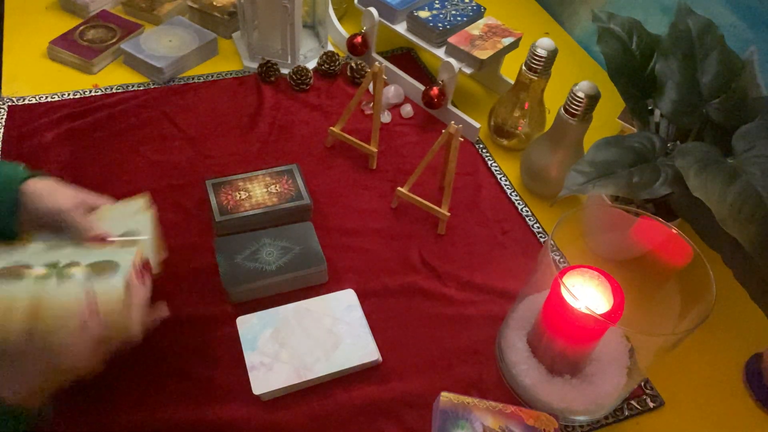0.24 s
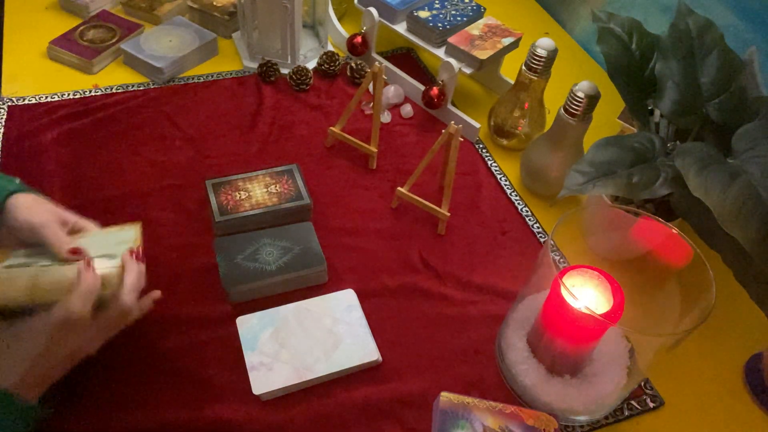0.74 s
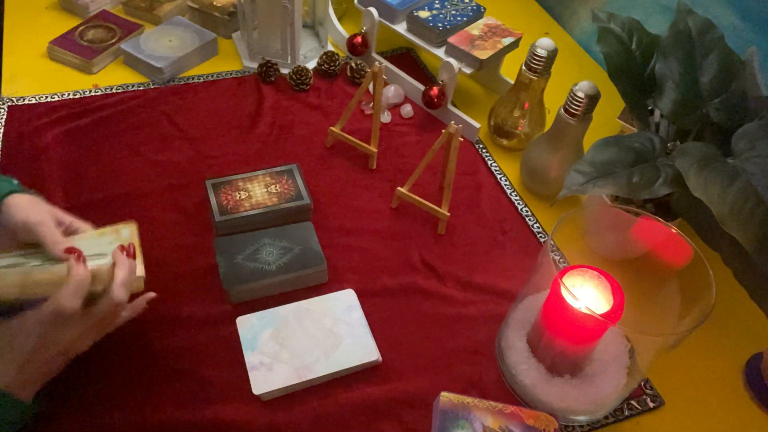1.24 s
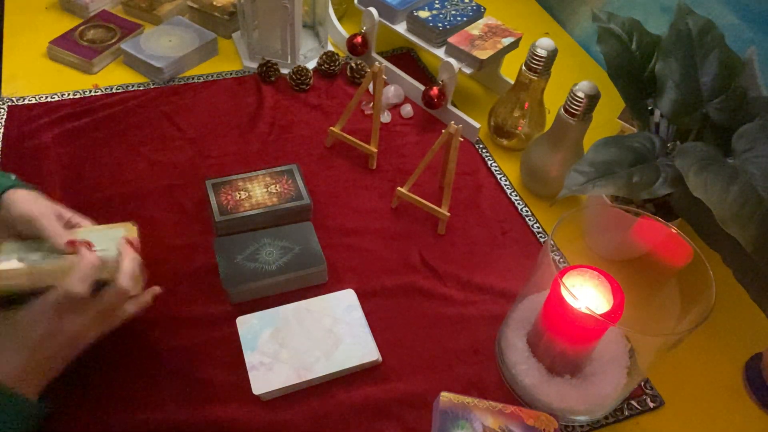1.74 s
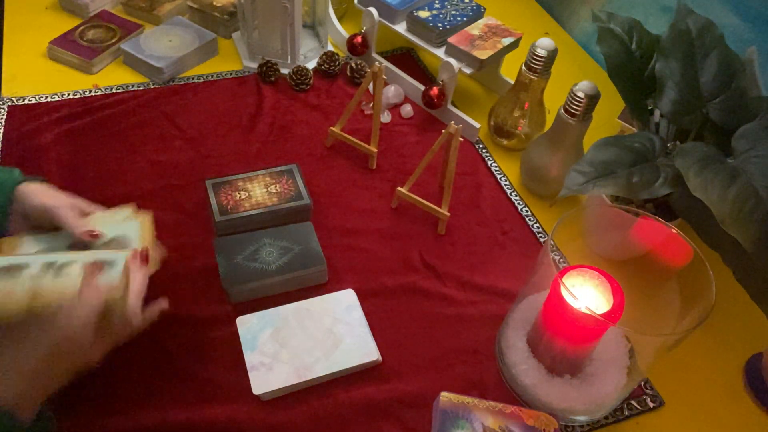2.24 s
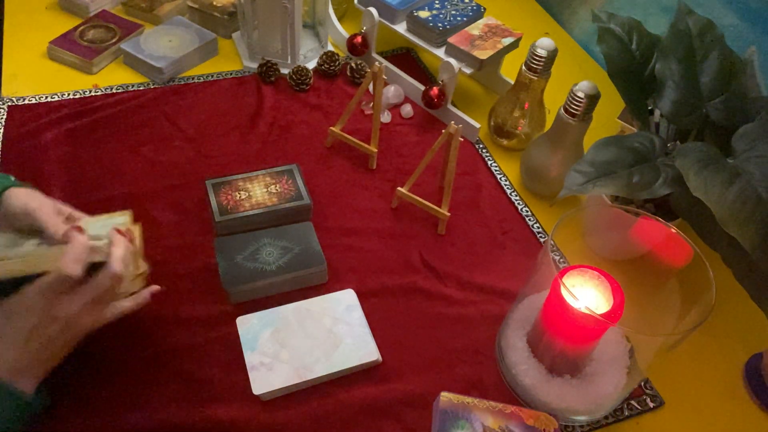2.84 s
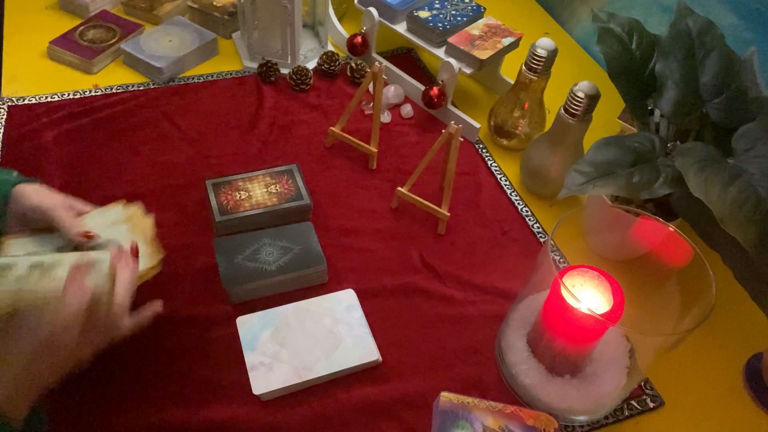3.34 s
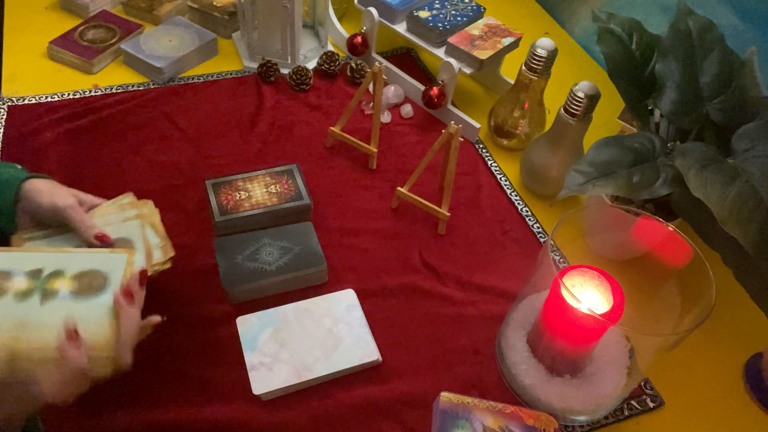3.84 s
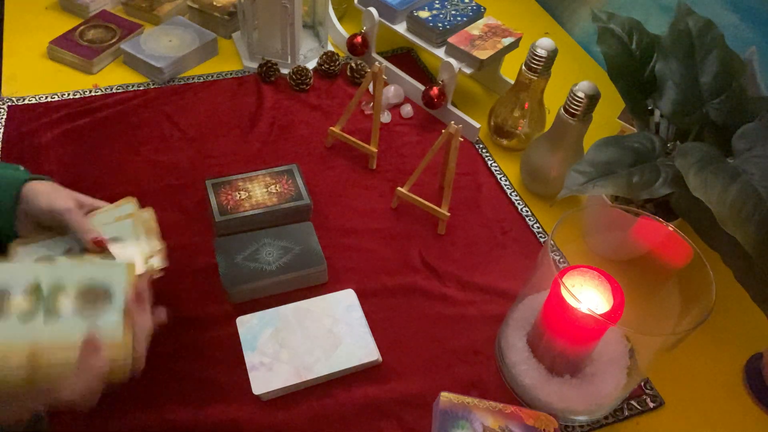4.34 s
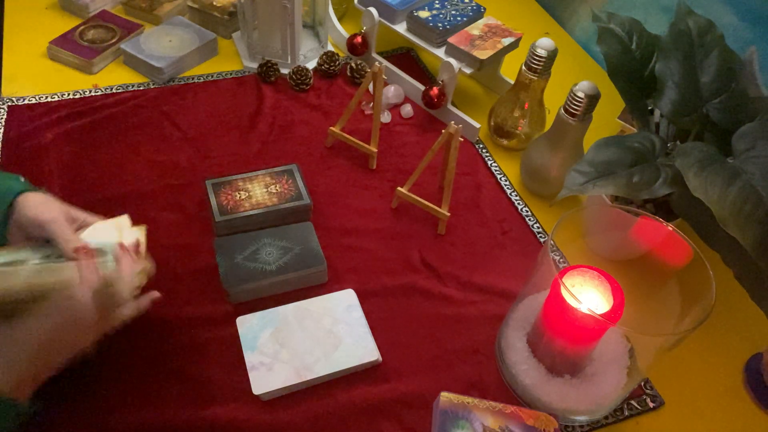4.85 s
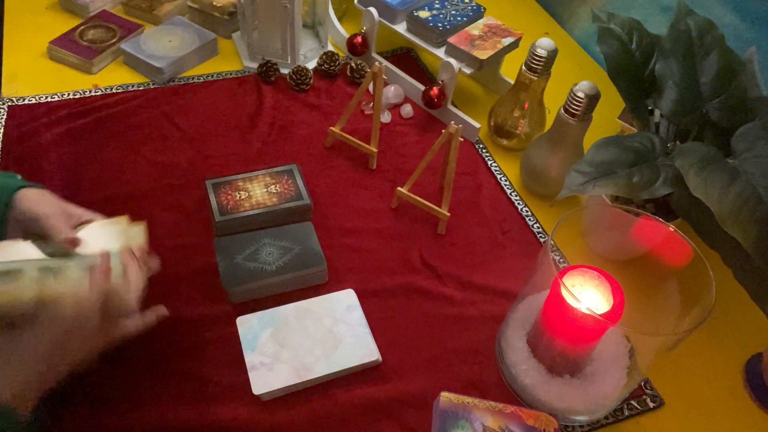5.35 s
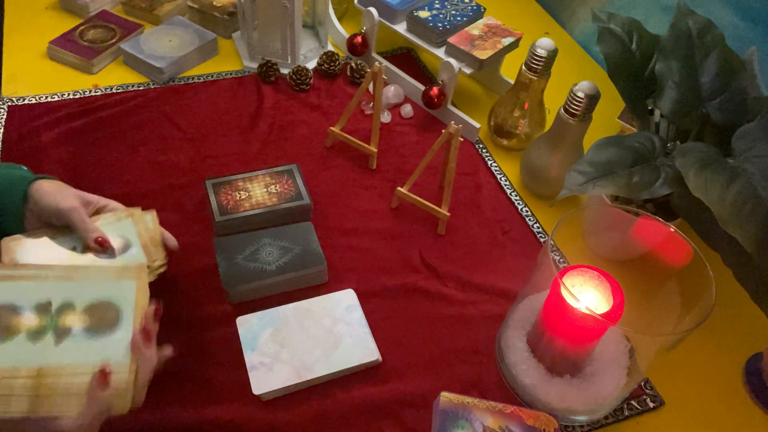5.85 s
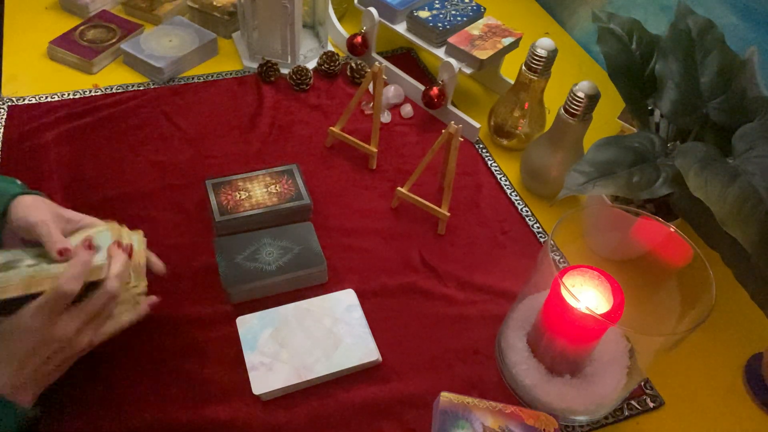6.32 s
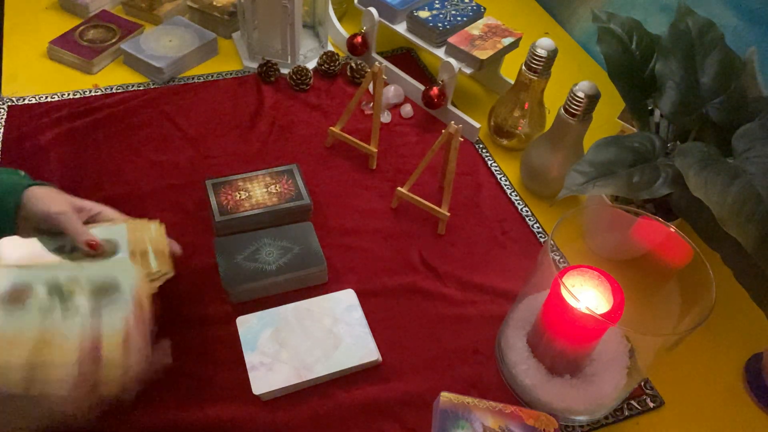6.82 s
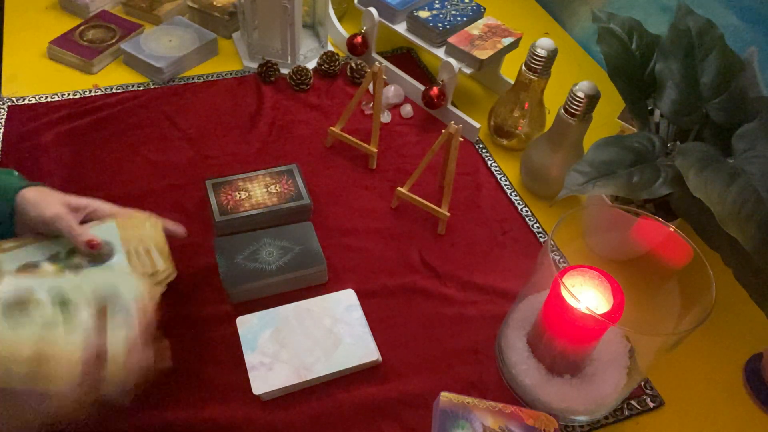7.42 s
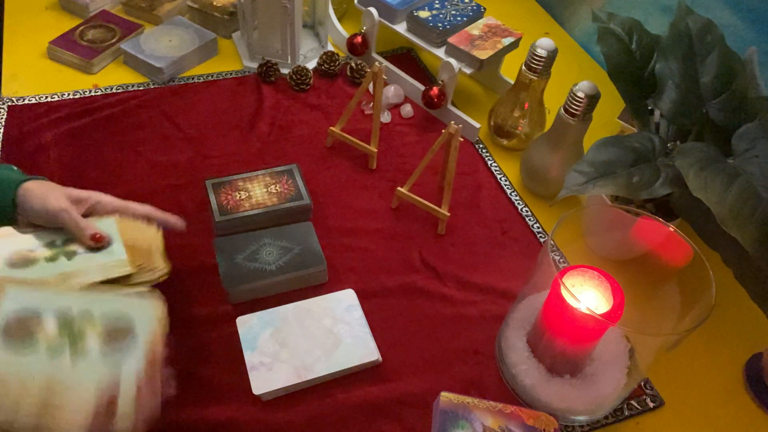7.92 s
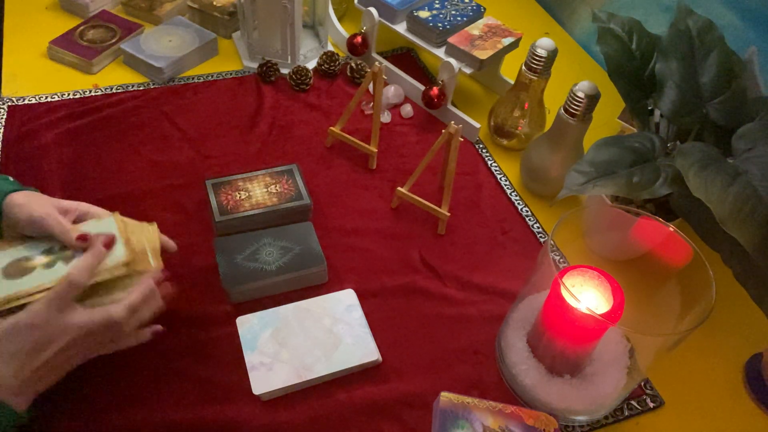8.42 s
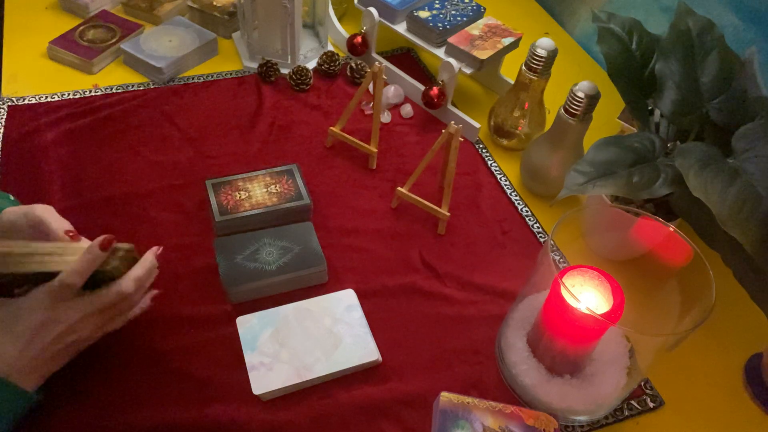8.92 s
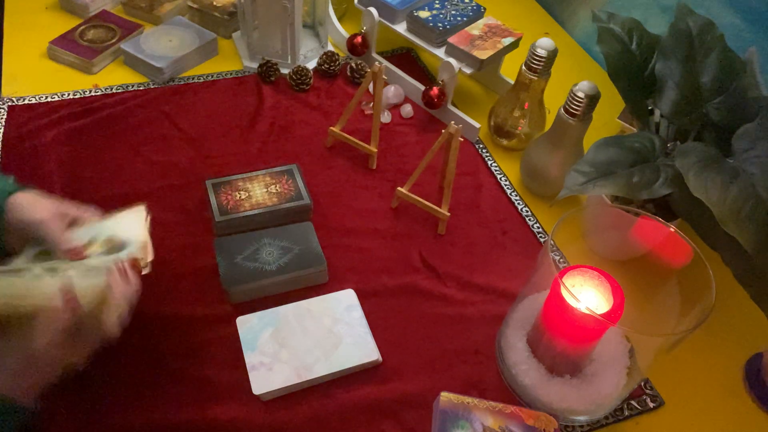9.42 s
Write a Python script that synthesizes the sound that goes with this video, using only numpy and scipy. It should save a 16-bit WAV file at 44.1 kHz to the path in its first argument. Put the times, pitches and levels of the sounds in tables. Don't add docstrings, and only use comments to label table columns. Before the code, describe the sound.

Hands shuffle big coated cards close by in a quiet furnished room: knock, drag, slide, slap, about four strokes a second.

```python
import sys
import numpy as np
from scipy import signal
from scipy.fft import rfft, irfft, next_fast_len
from scipy.io import wavfile
from scipy.ndimage import map_coordinates

SR = 44100
rng = np.random.default_rng(int(sys.argv[2]) if len(sys.argv) > 2 else 0)


def generate_wav(sig):
    pcm = np.round(np.clip(np.atleast_2d(sig).T, -1, 1) * 32767).astype(np.int16)
    wavfile.write(sys.argv[1], SR, pcm)


def ratio_of_db(decibels):
    return 10 ** (np.asarray(decibels, float) / 20)


N = 426447

# frequency in Hz, level in dB.
AIR_COLOUR = [(30, -12), (50, 0), (90, -3), (170, -15), (700, -30), (9000, -29), (16000, -33)]
# frequency in Hz, level in dB.
MAINS_HUM = [(49.7, -68), (99, -71)]
# frequency in Hz, time to fall 60 dB in seconds.
ROOM_DECAY = [(80, 0.25), (400, 0.29), (2000, 0.26), (10000, 0.22)]
# frequency in Hz, level in dB.
FURNISHINGS = [(300, 4.5), (900, 5), (2500, -1), (4000, 0), (6500, -3.5), (12000, -4.5)]
# frequency in Hz, likeness as a share.
PORT_LIKENESS = [(60, 0.63), (300, 1), (550, 0.0034), (2500, 0), (4200, 0), (8000, 0.61), (15000, 0)]
# delay in seconds, level in dB.
NEAR_ECHOES = [(.0005, -8), (.0011, -10.5), (.0022, -6.5), (.0035, -2.5), (.006, -9.5), (.009, -12),
               (.024, -20)]

# frequency in Hz, phase in radians.
PORT_LEAD = [(0, 0), (300, .1), (600, 1.1), (1500, .9), (2300, 2.3), (3000, 3.1), (4200, 4.1), (5700, 5),
             (7800, 6.28), (10500, 9.42), (13200, 12.57), (16500, 16.2)]
# frequency in Hz, level in dB.
TREBLE_END = [(15100, 2), (15900, -30.5), (16500, -46.5), (16600, -93.5)]
# frequency in Hz, level in dB.
SUM_COLOUR = [(9800, 0), (10250, -30), (10850, -30), (11150, 0)]
# frequency in Hz, level in dB.
DIFFERENCE_COLOUR = [(1500, 0), (3000, -3), (7300, -1), (7800, -22), (8300, -1), (12600, -2), (13100, -24),
                     (13700, 3)]

# frequency in Hz, width in Hz, level in dB.
PILE_RESONANCES = [(341, 273, -3), (506, 131, 1), (767, 190, -4.5), (1470, 244, -1.5), (2585, 1230, -4)]
# frequency in Hz, level in dB.
EDGE_COLOUR = [(1500, -12), (2500, 0), (4000, -1), (6000, -3), (7700, -5), (10500, -7), (13000, -8),
               (16000, -9)]
# frequency in Hz, level in dB.
LOW_HISS = [(3000, -12), (5000, -11.5), (7500, 1), (9500, -3.5), (11000, -17.5)]
# frequency in Hz, level in dB.
HIGH_HISS = [(8000, -27), (10500, -3.5), (13000, -8), (15000, -6.5), (16500, -32)]
# frequency in Hz, level in dB.
RUSTLE_SHEEN = [(900, -28.5), (2500, -9), (7500, -5.5), (13000, -8.5), (16000, -15)]

# time in seconds, card rustle in dB, bright rustle in dB.
SQUARING = [(8.66, -80, -101), (8.699, -63, -60), (8.745, -61.5, -66), (8.77, -69, -64.5), (8.82, -70, -59),
            (8.88, -79.5, -78), (8.96, -77.5, -71), (9.02, -81.5, -63.5), (9.09, -89, -79),
            (9.201, -59, -55.5), (9.24, -62, -55)]
# start in seconds, knock delay in seconds, knock in dB, edge click in dB, drag in dB.
BRISK_TOUCHES = [(.194, 0.0042, -22.5, -14, -58), (0.47, 0.0097, -32, -2, -55.5),
                 (.745, 0.0017, -19.5, -16.5, -60), (1.015, 0.0086, -30, -10, -59),
                 (1.291, 0.013, -34.5, -8, -60), (1.557, 0.0075, -34, -9, -62),
                 (1.819, .004, -9.5, -14.5, -59), (2.097, 0.01, -28, -7, -59),
                 (2.376, 0.0051, -31.5, -12.5, -62), (2.643, 0.0056, -22, -14.5, -57.5),
                 (2.901, 0.0067, -21, -2.5, -57), (3.19, .011, -27, -12, -58.5),
                 (3.473, 0.007, -22, -19, -55.5), (3.754, 0.0029, -24.5, -11.5, -62),
                 (4.02, .013, -23, -7.5, -57), (4.295, 0.021, -33, 2.5, -57),
                 (4.568, .003, -31.5, -14, -57)]
# start in seconds, knock delay in seconds, knock, edge click and drag in dB.
EASY_PACE_TOUCHES = [(4.852, 0.01, -30, -11, -58.5), (5.147, 0.011, -35, -7, -56.5),
                     (5.445, 0.017, -30, -3, -60), (5.739, 0.031, -25.5, -11, -57),
                     (6.044, 0.028, -28, -12, -59.5), (6.363, .009, -23.5, -11, -57),
                     (6.66, 0.0072, -21, -15, -58), (6.946, 0.0034, -22, -13, -59.5),
                     (7.255, .003, -22, -10.5, -60.5), (7.551, 0.0062, -36.5, -0.5, -60),
                     (7.849, 0.0035, -25, -3, -61.5), (8.141, .004, -31, -12.5, -60),
                     (8.43, 0.0049, -28.5, 3, -69), (9.392, 0.0047, -27.5, -21, -53)]
# start in seconds, hiss in dB, slide in seconds, dullness in dB, tip pop in dB.
BRISK_SLIPS = [(0.012, -20.5, 0.0092, -5, -27), (.288, -22.5, 0.016, -1, -26.5), (.559, -21, .015, -8, -20),
               (0.8386, -22.5, .024, 2, -31.5), (1.106, -21, 0.021, -6, -24),
               (1.381, -17.5, 0.016, -6.5, -27.5), (1.653, -18, 0.02, -11, -28),
               (1.9176, -20.5, 0.02, 0.5, -26), (2.194, -17.5, 0.014, -5, -32),
               (2.4673, -22, 0.025, -6, -33.5), (2.757, -21, .016, -17.5, -26.5),
               (3.032, -30.5, 0.009, 5, -32.5), (3.286, -20, .012, 1.5, -35),
               (3.567, -20.5, 0.015, -0.5, -28), (3.8469, -19.5, 0.017, -14, -21.5),
               (4.111, -31, 0.019, -3, -21.5), (4.389, -20, 0.0069, -1, -27.5),
               (4.6681, -19.5, 0.012, -3, -22)]
# start in seconds, hiss in dB, slide in seconds, dullness and tip pop in dB.
EASY_PACE_SLIPS = [(4.953, -24.5, 0.012, -20, -23), (5.246, -32.5, 0.017, -1, -23.5),
                   (5.562, -12.5, 0.0079, -9.5, -36.5), (5.8677, -22, 0.019, 2, -34.5),
                   (6.174, -26.5, 0.0067, 1.5, -31), (6.466, -24.5, 0.0042, 7.5, -31.5),
                   (6.768, -24, .01, 0.5, -32.5), (7.0666, -28, 0.012, 2.5, -32.5),
                   (7.368, -26.5, 0.018, -1.5, -35), (7.656, -31.5, 0.027, -1.5, -36),
                   (7.963, -28, 0.016, -2, -37), (8.255, -47.5, 0.02, 7, -37.5),
                   (9.241, -16.5, 0.012, -30, -21), (9.5135, -35, 0.0089, 10, -38)]
# start in seconds, pop peak in dB, air pocket in Hz, edge click in dB.
FLAT_SLAPS = [(.032, -16, 2050, -8.5), (.316, -27, 690, 4), (0.586, -35, 1140, -4), (.876, -29.5, 1470, 5),
              (1.143, -20.5, 1160, -7.5), (1.411, -20.5, 1820, -6), (1.685, -14, 1540, -5),
              (1.95, -26.5, 854, -0.5), (2.219, -19, 870, -20), (2.498, -13, 2140, 0),
              (2.786, -33.5, 1470, -5), (3.058, -16, 850, -34), (3.31, -30.5, 855, -11),
              (3.596, -29, 900, 0.5), (3.879, -29, 1200, 4.5), (4.141, -28, 1200, 1),
              (4.416, -24, 860, -11.5), (4.69, -43, 900, -21), (4.981, -41, 805, -91),
              (5.273, -38.5, 690, 2), (5.58, -30, 820, -1.5), (5.905, -34.5, 730, -28),
              (6.196, -34, 999, -5), (6.489, -49, 800, -18), (6.795, -45, 800, -5), (7.1, -40, 800, -14),
              (7.41, -34, 1357, -6.5), (7.697, -38, 800, -8), (9.264, -53, 874, -34),
              (9.526, -18, 1440, -7.5)]
# start in seconds, pop peak in # dB, air pocket in Hz, edge click in
# dB.
LOOSE_CARDS = [(.002, -33, 890, -3), (0.023, -45.5, 2190, 12), (.472, -30, 1820, -13),
               (2.098, -36.5, 1490, -8), (3.039, -41.5, 1500, 9.5), (4.049, -42, 1500, 1),
               (4.394, -37.5, 1480, 8), (4.696, -44, 900, 0), (6.044, -58.5, 1590, 16.5),
               (9.254, -25, 1480, -9.5), (1.588, -39, 1450, -6), (2.135, -34.5, 1370, -7),
               (2.407, -36.5, 1390, -3.5), (2.671, -26, 1280, -2.5), (2.939, -24.5, 1330, -9),
               (3.498, -39, 1250, 6.5), (5.292, -39, 620, -35), (5.873, -33, 451, -26),
               (6.384, -36.5, 1290, 2), (6.689, -48.5, 1380, -8), (7.469, -46, 1200, -8.5),
               (7.579, -30, 1130, -3.5), (7.872, -25, 1280, -20), (8.163, -31, 1470, -7),
               (8.47, -26, 1110, -11), (8.504, -35.5, 805, -5), (8.679, -46.5, 1294, -16),
               (9.414, -28, 1470, -4), (9.452, -31.5, 1650, -16),
               (2.49, -33, 2900, -1), (2.506, -43, 2700, -11), (1.9, -27, 4700, 0), (2.79, -24, 1400, -13),
              (4.028, -29, 1500, -14), (4.131, -23.5, 1720, -8), (4.1, -42, 1600, -5),
              (4.892, -42, 1200, -10), (5.263, -28, 1200, -15), (5.187, -42.5, 1500, -4),
              (5.572, -37, 2500, 2.5), (6.061, -42, 1600, -17), (7.1, -32, 1600, -15),
              (6.081, -40, 610, -7), (6.364, -38, 1500, -8), (8.278, -38.5, 1500, -4),
              (6.995, -40, 1910, -3), (7.073, -42, 1500, 8.5), (0.76, -39, 1100, -16),
              (1.8, -39, 1400, -18)]
# start in seconds, click in dB.
EDGE_TICKS = [(.221, -40), (0.775, -40), (1.018, -36), (1.025, -43), (1.312, -52), (1.853, -45),
              (2.129, -49), (2.522, -33), (2.692, -43), (3.056, -31), (3.289, -33.5), (3.3, -36),
              (3.525, -49), (3.762, -39), (4.871, -43), (5.17, -40), (5.458, -45), (5.747, -41.5),
              (5.78, -48), (5.842, -58), (6.083, -40.5), (6.964, -38), (7.004, -54), (7.01, -51),
              (7.275, -35.5), (7.29, -43), (7.595, -39), (7.667, -37), (7.762, -48), (7.865, -39),
              (8.037, -51.5), (7.973, -37), (8.455, -39), (8.487, -38.5), (8.492, -44), (8.516, -59),
              (8.958, -58.5), (9.522, -26)]
# time in seconds, peak in dB.
PALM_PUSH = [
    (0, -41),
    (2.4, -44),
    (3, -45),
    (3.9, -40.5),
    (5.6, -45),
    (7.7, -48.5),
    (8.4, -44),
    (9.2, -46.5),
    (9.6, -39),
]

KNOCK_HZ, TIP_HZ, RELEASE_HZ = 1490, 697, 660
POCKET_SPREAD = 0.02
FIRST_DB, FIRST_CLICK_DB = 14, -10
RELEASE_DB, RELEASE_CLICK_DB, RELEASE_S = -24.5, -7.5, .005
TIP_CLICK_DB = -12
FLAP_HZ, FLAP_DB, FLAP_S = 420, -7.5, .004
TICK_POP_DB = -8
TIGHT_HZ, SLACK_HZ_PER_S2, TIGHTEST_S = 173, 190, 7
OVERRUN_S = 0.0013
BRUSH_DB, BRUSH_S, BRUSH_DULL_DB = 12, 0.023, 4
DRAG_S, DRAG_BRIGHT_DB = 0.11, 1.5
PALM_HZ, PALM_SPREAD = 101.5, 0.14
TOUCH_PUSH_DB, KNOCK_SHARE = -0.5, 0.22


def unit(x):
    return x / np.sqrt(np.mean(x ** 2) + 1e-20)


def along(points, hz):
    f, v = np.transpose(points)
    return np.interp(np.log(hz + 1), np.log(f + 1), v)


def filtered(x, response):
    m = next_fast_len(N + SR // 2)
    return irfft(rfft(x, m) * response(np.fft.rfftfreq(m, 1 / SR)), m)[..., :N]


def coloured(x, spectrum):
    return filtered(x, lambda hz: ratio_of_db(along(spectrum, hz)))


def add(track, s, sound):
    part = track[round(s * SR):][:len(sound)]
    part += sound[:len(part)]


def floor():
    shared, opposed = rng.standard_normal((2, N))
    opposed = filtered(opposed, lambda hz: hz / (hz + 250))
    ports = np.array([shared + opposed, shared - opposed])
    air = ratio_of_db(-72) * unit(coloured(ports, AIR_COLOUR))
    t = np.arange(N) / SR
    hum = np.zeros(N)
    for hz, db in MAINS_HUM:
        sway = map_coordinates(rng.standard_normal(round(8 * N / SR) + 4), [8 * t])
        hum += ratio_of_db(db + 0.5 + 2 * sway) * np.sin(2 * np.pi * hz * t)
    return air + np.sqrt(2) * hum


def tail():
    hz, t, z = signal.stft(rng.standard_normal((2, SR // 2)), SR, nperseg=256)
    turn = np.arccos(np.clip(along(PORT_LIKENESS, hz), 0, 1))[:, None] / 2
    same = z[0] * np.cos(turn)
    other = z[1] * np.sin(turn)
    decay_db = along(FURNISHINGS, hz)[:, None] - 60 * t / along(ROOM_DECAY, hz)[:, None]
    fading = np.array([same + other, same - other]) * ratio_of_db(decay_db)
    late = signal.istft(fading, SR, nperseg=256)[1]
    late = ratio_of_db(-10.0) * np.pad(late, ((0, 0), (300, 0))) / np.linalg.norm(late[0])
    for delay, db in NEAR_ECHOES:
        moved = delay * ratio_of_db(.8 * rng.standard_normal())
        late[:, round(moved * SR)] += ratio_of_db(db) * rng.uniform(-0.3, 1.1, size=2)
    return late


def room(x):
    wet = np.zeros((2, N + SR))
    step = SR // 7
    for k in range(0, N, step):
        answer = signal.fftconvolve(x[None, k:k + step], tail(), axes=1)
        wet[:, k:k + answer.shape[1]] += answer
    return wet[:, :N]


def deck(f):
    response = 0
    for k, (centre, width, db) in enumerate(PILE_RESONANCES):
        damping = 1j * f * width
        response = response + (-1) ** k * ratio_of_db(db) * damping / (centre * centre - f * f + damping)
    return response


def grit(grain_db, rate):
    jumps = map_coordinates(rng.standard_normal(int(N * rate / SR) + 4), [np.arange(N) * rate / SR])
    return unit(ratio_of_db(grain_db * jumps) * rng.standard_normal(N))


def rustle():
    s, body_db, bright_db = np.transpose(SQUARING)
    t = np.arange(N) / SR
    body = ratio_of_db(np.interp(t, s, body_db, -120, -120))
    bright = ratio_of_db(np.interp(t, s, bright_db, -120, -120))
    t = t[:SR // 3]
    for s, *_, drag_db in BRISK_TOUCHES + EASY_PACE_TOUCHES:
        stroke = (1 - np.exp(-t / 0.0023)) / (1 + (t / (DRAG_S + 0.041)) ** 6)
        brush = 1 + 4 * np.exp(-t / 0.023)
        add(body, s - .002, ratio_of_db(drag_db) * stroke * brush)
        add(bright, s - .002, ratio_of_db(drag_db + DRAG_BRIGHT_DB) * stroke)
    creep = grit(grain_db=3.0, rate=300)
    return body * unit(filtered(creep, deck)) + bright * unit(coloured(creep, RUSTLE_SHEEN))


def rubs():
    brushes = [(s, drag_db + BRUSH_DB, BRUSH_S, BRUSH_DULL_DB)
               for s, *_, drag_db in BRISK_TOUCHES + EASY_PACE_TOUCHES]
    full_slides = [(s, db, slide + OVERRUN_S, dull_db)
                   for s, db, slide, dull_db, _ in BRISK_SLIPS + EASY_PACE_SLIPS]
    return brushes + full_slides


def slides():
    upper, lower = np.zeros(N), np.zeros(N)
    t = np.arange(SR // 8) / SR
    for s, db, length, dull_db in rubs():
        u = t / max(length, .004)
        stroke = (1 - np.exp(-u / 0.16)) / (1 + u ** 7)
        add(upper, s, ratio_of_db(db - 13.0) * stroke)
        add(lower, s, ratio_of_db(db + dull_db - 17.0) * stroke)
    rub = grit(grain_db=3.5, rate=700)
    return upper * unit(coloured(rub, HIGH_HISS)) + lower * unit(coloured(rub, LOW_HISS))


def pushes():
    rows = [(s, 0) for s, *_ in FLAT_SLAPS]
    for s, after, knock_db, *_ in BRISK_TOUCHES + EASY_PACE_TOUCHES:
        rows.append((s + after, TOUCH_PUSH_DB + KNOCK_SHARE * knock_db))
    pitch = PALM_HZ * np.exp(PALM_SPREAD * rng.standard_normal(len(rows)))
    return [(s, db + np.interp(s, *np.transpose(PALM_PUSH)), hz) for (s, db), hz in zip(rows, pitch)]


def thumps():
    palm = np.zeros(N)
    t = np.arange(SR // 5) / SR
    for s, db, hz in pushes():
        push = ratio_of_db(-60 * t / 0.048) * np.sin(2 * np.pi * hz * t)
        table = ratio_of_db(-11.0 - 60 * t / 0.27) * np.sin(2 * np.pi * .6 * hz * t)
        add(palm, s, ratio_of_db(db + 14.0) * (push + table) * (1 - np.exp(-t / 0.0025)))
    return palm


def landings():
    rows = []
    for s, after, knock_db, click_db, drag_db in BRISK_TOUCHES + EASY_PACE_TOUCHES:
        tightness_hz = max(TIGHT_HZ - SLACK_HZ_PER_S2 * (s - TIGHTEST_S) ** 2, 0)
        rows.append((s, drag_db + FIRST_DB, KNOCK_HZ, FIRST_CLICK_DB))
        rows.append((s + after, knock_db, KNOCK_HZ + tightness_hz, click_db))
    for s, hiss_db, slide, _, tip_db in BRISK_SLIPS + EASY_PACE_SLIPS:
        rows.append((s + RELEASE_S, hiss_db + RELEASE_DB, RELEASE_HZ, RELEASE_CLICK_DB))
        rows.append((s + slide, tip_db, TIP_HZ, TIP_CLICK_DB))
        rows.append((s + slide + FLAP_S, tip_db + FLAP_DB, FLAP_HZ, TIP_CLICK_DB))
    rows += [(s, db + TICK_POP_DB, KNOCK_HZ, -TICK_POP_DB) for s, db in EDGE_TICKS]
    spread = np.exp(POCKET_SPREAD * rng.standard_normal(len(rows)))
    varied = [(s, db, hz * k, click_db) for (s, db, hz, click_db), k in zip(rows, spread)]
    return varied + FLAT_SLAPS + LOOSE_CARDS


def slaps():
    clicks, pops, crunch = np.zeros(N), np.zeros(N), np.zeros(N)
    t = np.arange(SR // 14) / SR
    grains = np.pad(grit(grain_db=7.0, rate=600), (0, len(t)))
    for s, db, pocket_hz, click_db in landings():
        snap = ratio_of_db(-60 * t / 0.0045) * (1 - np.exp(-t / 0.00013)) * rng.standard_normal(len(t))
        snap[0] = 0.6 * np.linalg.norm(snap)
        add(clicks, s + 0.001, ratio_of_db(db + click_db + 27.5) * snap / np.linalg.norm(snap))

        pop = ratio_of_db(-60 * t / 0.0059) * np.sin(2 * np.pi * pocket_hz * t) * (1 - np.exp(-t / 0.00039))
        add(pops, s + 0.00121, ratio_of_db(db + 6.0) * pop)

        fade = ratio_of_db(-60 * t / 0.041) * (1 - np.exp(-(t / 0.00074) ** 2))
        cards = fade * grains[round(s * SR):][:len(t)]
        cards = ratio_of_db(db + 0.5) * cards * np.linalg.norm(fade) / np.linalg.norm(cards)
        add(pops, s - .001, ratio_of_db(-20.5) * signal.fftconvolve(cards, pop[:SR // 50]))
        add(crunch, s - .001, cards)
    edges = coloured(clicks + ratio_of_db(-18.5) * crunch, EDGE_COLOUR)
    return edges + pops + ratio_of_db(5.0) * filtered(crunch, deck)


def scene():
    cards = rustle() + slides() + thumps() + slaps()
    direct = cards * ratio_of_db([[-.9], [.9]])
    heard = direct + room(cards)

    def port_phase(hz):
        half_lead = np.interp(hz, *np.transpose(PORT_LEAD)) / 2
        return np.exp(1j * half_lead * np.array([[1], [-1]]))

    return filtered(heard, port_phase) + floor()


def top_cut(x):
    return signal.sosfilt(signal.butter(12, 16510, fs=SR, output="sos"), x)


def record(dry):
    left, right = filtered(dry, lambda hz: (1j * hz / (50 + 1j * hz)) ** 4 * ratio_of_db(along(TREBLE_END, hz)))
    mid = coloured((left + right) / 2, SUM_COLOUR)
    side = coloured((left - right) / 2, DIFFERENCE_COLOUR)
    both = np.array([mid + side, mid - side])
    rounded = .85 * np.tanh(both / .85)
    return top_cut(rounded)


dry = scene()
out = record(dry)
generate_wav(out)
```